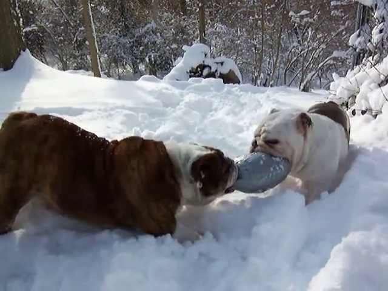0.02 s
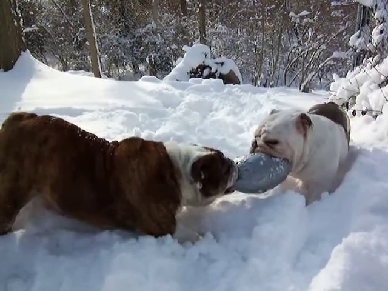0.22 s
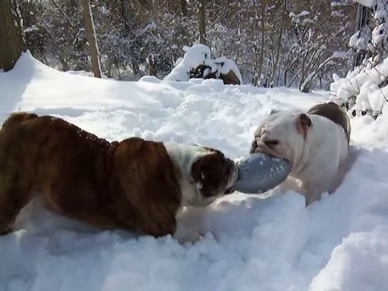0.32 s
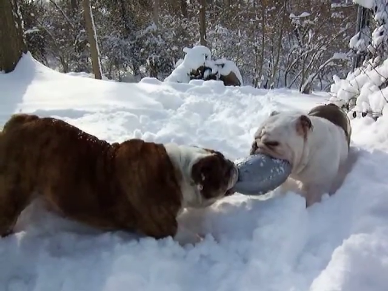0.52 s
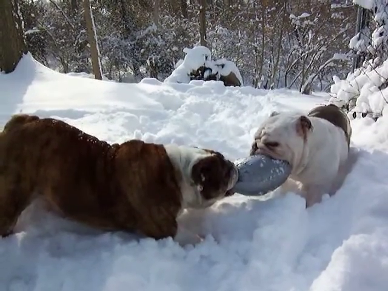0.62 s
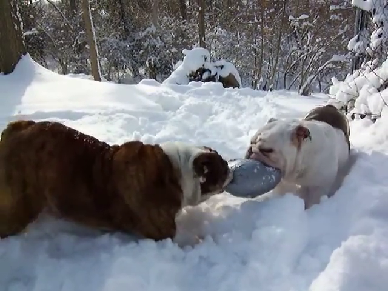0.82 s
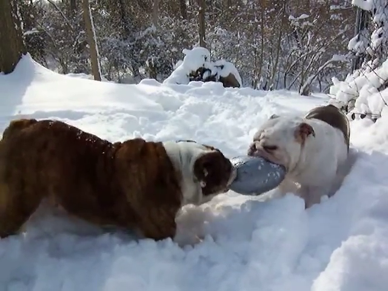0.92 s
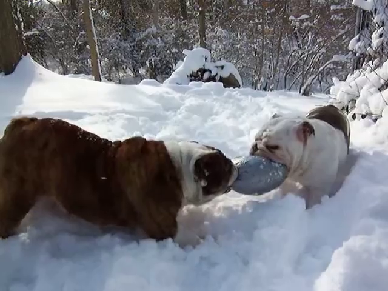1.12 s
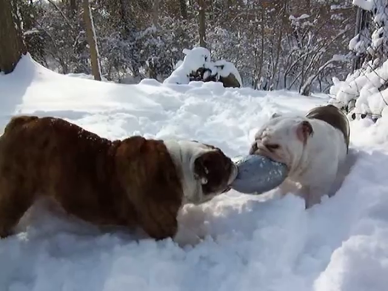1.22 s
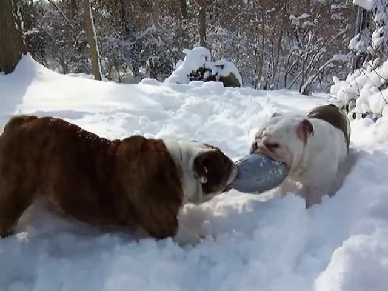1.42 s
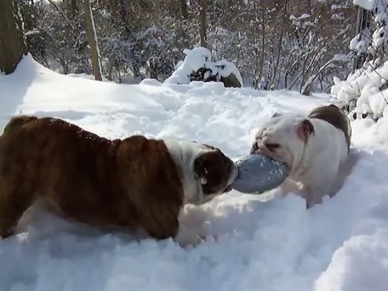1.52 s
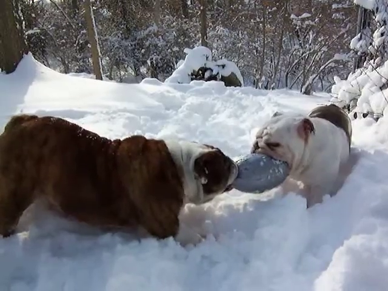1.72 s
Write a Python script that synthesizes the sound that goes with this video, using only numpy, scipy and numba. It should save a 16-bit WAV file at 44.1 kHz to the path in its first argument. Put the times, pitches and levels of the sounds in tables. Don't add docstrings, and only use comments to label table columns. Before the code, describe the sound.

Rough fluttering dog growl breaks into a single sharp bark, followed by a quieter growl.

```python
import sys
import numpy as np
from scipy import signal
from scipy.fft import rfft, irfft
from scipy.io import wavfile
from numba import njit

SR = 44100
rng = np.random.default_rng(int(sys.argv[2]) if len(sys.argv) > 2 else 0)


def wav_record(signal):
    frames = np.transpose(np.atleast_2d(signal))
    bounded = np.clip(frames, -1, 1)
    quanta = np.round(bounded * 32767).astype(np.int16)
    wavfile.write(sys.argv[1], SR, quanta)


def volts(x):
    e = np.asarray(x, float) / 20
    return 10 ** e


N = 79380
TIME_S = np.arange(N) / SR


def rms_one(x):
    return x / np.sqrt(np.mean(x ** 2) + 1e-20)


def in_time(rows):
    s, *columns = np.transpose(rows)
    return [np.interp(TIME_S, s, column) for column in columns]


def impulses(s, heights):
    x = np.zeros(N)
    x[(s * SR).astype(int)] = heights
    return x


@njit
def two_pole(x, a1, a2):
    y = np.zeros(len(x))
    for i in range(2, len(x)):
        y[i] = (1 - a2) / 2 * (x[i] - x[i - 2]) + a1[i] * y[i - 1] - a2 * y[i - 2]
    return y


def resonate(x, hz, width_hz):
    r = np.exp(-np.pi * width_hz / SR)
    a1 = 2 * r * np.cos(2 * np.pi * hz / SR)
    x = x + 1e-18
    if np.ndim(hz):
        return two_pole(x, a1, r * r)
    return signal.lfilter([(1 - r * r) / 2, 0, (r * r - 1) / 2], [1, -a1, r * r], x)


def twice(x, hz, width_hz):
    return resonate(resonate(x, hz, width_hz), hz, width_hz)


def tract(x, table, scale=1, unsteady=False):
    def waver():
        if not unsteady:
            return 0
        return np.interp(np.arange(N), np.linspace(0, N, 60), rng.standard_normal(60))

    total = 0
    for k, (hz, width_hz, db) in enumerate(table):
        gain = volts(db + 1.0 * waver())
        centre_hz = hz * (scale + 0.029 * waver())
        total = total + (-1) ** k * gain * twice(x, centre_hz, width_hz)
    return rms_one(total)


def bumps(s, db, length, leak=0):
    d = (TIME_S - np.array(s)[:, None]) / np.array(length)[:, None]
    skew = np.where(d < -.15, 1.47 * (d + 0.15), 0.75 * (d + 0.056))
    swell = np.exp(-4 * skew ** 2)
    skirt = np.exp(-.6 * d ** 2)
    return volts(np.array(db)) @ (swell + leak * skirt) / (1 + leak)


def folds(rate_hz, jitter, spread_db, breath, puff_s):
    draws = np.clip(rng.standard_normal((700, 2)), -1.6, 1.6)
    periods = np.clip(1 + jitter * draws[:, 0], .4, 2)
    cycles = np.interp(np.cumsum(periods), np.cumsum(rate_hz) / SR, np.arange(N))
    pulses = np.zeros(N)
    pulses[cycles.astype(int)] = -volts(spread_db * draws[:, 1])
    pulses[-1] = 0
    puff = signal.lfilter([1], [1, -np.exp(-1 / (puff_s * SR))], abs(pulses)) * rng.standard_normal(N)
    softened = signal.lfilter([1], [1, -.7], pulses)
    return pulses, rms_one(softened) + breath * rms_one(puff)


def growl(flaps, hiss_lag_s, chest, throat, nose, mouth, chest_hz, chest_width_hz, leak,
          jitter, spread_db, breath, chest_gate, hiss_db):
    s, throat_db, nose_db, length = np.transpose(flaps)
    chest_db, rate_hz = in_time(chest)
    pulses, source = folds(rate_hz, jitter, spread_db, breath, 0.015)

    rumble = twice(rms_one(pulses) + 2.3 * rng.standard_normal(N), chest_hz, chest_width_hz)
    rumble = in_time(chest_gate)[0] * volts(chest_db) * rms_one(rumble)

    hiss = tract(.5 * source + rng.standard_normal(N), nose)
    hiss = hiss * bumps(s + hiss_lag_s, nose_db, length, 1.3 * leak) * volts(hiss_db)

    sag = np.interp(TIME_S, np.ravel(s[:, None] + [-.016, .016]), np.tile([1, -1], len(s)))
    scale = 1 + 0.22 * (in_time(mouth)[0] - .5) + .075 * sag
    voice = tract(source, throat, scale, unsteady=True)
    return bumps(s, throat_db, length, leak) * voice + rumble + hiss


def outdoors():
    # time in seconds, wind level in dB.
    gusts = [(0.0, -27.5), (0.034, -58), (0.1, -42), (0.832, -42.5), (0.902, -55.5), (1.132, -58),
             (1.162, -49), (1.378, -52), (1.408, -56), (1.638, -50), (1.678, -59), (1.8, -43)]
    # frequency in Hz, level in dB.
    air = [(59, -32), (200, -5.5), (817, -16), (2640, -21), (2950, -29.5), (3120, -27.5), (7060, -25),
           (8500, -37), (11000, -64.5), (18700, -120)]
    band = signal.butter(3, [30, 90], "band", fs=SR, output="sos")
    wind = signal.sosfilt(band, rng.standard_normal(N + SR))[SR:]
    air_hz, air_db = np.transpose(air)
    hz = np.fft.rfftfreq(N, 1 / SR) + 1
    shape = volts(np.interp(np.log(hz), np.log(air_hz), air_db)) * (hz > 200)
    still = irfft(rfft(rng.standard_normal(N)) * shape, N)
    return volts(in_time(gusts)[0]) * rms_one(wind) + volts(-64.5) * rms_one(still)


def ticks():
    # time in seconds, level in dB.
    clicks = [(.238, -25), (.252, -26), (.365, -24), (.373, -25), (.53, -24), (1.136, -42), (1.349, -44),
              (1.48, -39), (1.612, -46), (1.588, -48), (1.738, -48), (1.746, -46)]
    s, db = np.transpose(clicks)
    return resonate(impulses(s, -4 * volts(db)), 880, 1720)


def tugging_bodies():
    # time in seconds, level in dB.
    thumps = [(1.167, -43), (1.227, -44), (1.34, -39.5), (1.526, -50), (1.625, -55)]
    # time in seconds, level in dB.
    heaves = [(1.421, -42.5), (1.524, -52), (1.589, -49.5), (1.689, -51.5)]
    s, db = np.transpose(thumps)
    low = twice(impulses(s - .006, 400 * volts(db)), 88, 90)
    s, db = np.transpose(heaves)
    return low + twice(impulses(s - .012, -900 * volts(db)), 36.6, 40)


def snorts():
    # time in seconds, level in dB, length in seconds.
    breaths = [(.0, -47.5, 0.023), (0.037, -51.5, 0.043), (1.163, -60.5, 0.019), (1.72, -66, 0.026),
               (1.765, -62.5, 0.043), (1.544, -55.5, 0.041), (1.558, -52.5, 0.0055), (1.573, -54.5, 0.017),
               (1.593, -56, 0.014)]
    # centre in Hz, width in Hz, level in dB.
    nostrils = [(570, 260, 4.5), (1050, 1200, -3.5), (2440, 520, 1.5), (3720, 1170, 1.5),
                (5070, 1180, -8.5), (6610, 1500, 0), (8000, 1400, -27)]
    return bumps(*np.transpose(breaths)) * tract(rng.standard_normal(N), nostrils)


def ball_squeaks():
    # time in seconds, level in dB, length in seconds.
    rubs = [(.118, -45, 0.015), (0.255, -37, 0.011), (0.291, -39, 0.0064), (0.433, -41, 0.013),
            (0.564, -40, 0.025), (0.742, -39.5, 0.02), (1.057, -51.5, 0.046)]
    return rms_one(twice(rng.standard_normal(N), 1892, 470)) * bumps(*np.transpose(rubs))


def far_dog():
    # time in seconds, throat level in dB, nostril hiss in dB, length in seconds.
    flaps = [(.968, -39.5, -52.5, 0.049), (1.01, -47, -57.5, 0.021), (1.058, -47, -58.5, 0.038),
             (1.097, -48, -61, 0.021), (1.145, -44.5, -54, 0.026), (1.188, -48.5, -60.5, 0.03),
             (1.228, -55.5, -57.5, 0.023), (1.274, -48.5, -62, 0.05), (1.312, -56.5, -57, 0.018),
             (1.357, -48, -59, 0.027), (1.402, -51.5, -58, 0.026), (1.444, -51, -54, 0.011),
             (1.484, -52.5, -57, 0.022)]
    # time in seconds, delay of hiss behind voice in seconds.
    hiss_lag = [(1.0, 0.0041), (1.36, 0.011), (1.42, 0.013), (1.5, 0.026)]
    # time in seconds, level in dB, pulse rate in Hz.
    chest = [(0.95, -48.5, 175.0), (1.214, -53, 175.0), (1.374, -52.5, 175.0), (1.506, -49.5, 175.0),
             (1.544, -70, 175.0), (1.56, -70, 175.0)]
    # centre in Hz, width in Hz, level in dB.
    throat = [(542, 150, 5), (923, 203, 1), (1460, 490, -14), (1990, 290, -10), (3610, 480, -9.5)]
    # centre in Hz, width in Hz, level in dB.
    nose = [(2170, 740, -3.5), (3670, 1100, -3.5), (5000, 530, -10.5), (6440, 1600, -6.5)]
    # time in seconds, mouth opening from 0 to 1.
    mouth = [(1.0, 1), (1.05, 0.76), (1.109, 0.076), (1.15, 0.81), (1.21, 0.15), (1.3, 0.53), (1.502, 0.44)]
    lag_s = np.interp(np.array(flaps)[:, 0], *np.transpose(hiss_lag))
    return growl(flaps, lag_s, chest, throat, nose, mouth, chest_hz=157.3, chest_width_hz=73, leak=.25,
                 jitter=.14, spread_db=2, breath=.9,
                 chest_gate=[(.88, 0), (.93, 1), (1.5, 1), (1.53, 0)], hiss_db=-1.0)


def teeth_whistle():
    # time in seconds, level in dB, length in seconds.
    bursts = [(0.067, -50.5, 0.02), (0.112, -47.5, 0.024), (0.16, -40.5, 0.018), (0.208, -43.5, 0.017),
              (0.253, -48.5, 0.039), (0.297, -42.5, .03), (0.342, -45, 0.011), (.37, -45, 0.021),
              (.392, -51, 0.029), (0.431, -36.5, 0.011), (0.461, -45, .018), (0.481, -44, 0.007),
              (0.524, -45.5, 0.024), (0.568, -43.5, 0.027), (0.608, -41, .025), (0.664, -55.5, 0.044),
              (0.692, -42.5, .035), (0.746, -46, 0.036), (0.783, -41.5, 0.023), (1.159, -55.5, 0.013),
              (1.716, -62.5, 0.03), (1.762, -60.5, 0.044), (1.792, -66, 0.018)]
    breath = folds(np.full(N, 130.), .3, 3, 9, .006)[1]
    return rms_one(twice(breath, 5200, 650)) * bumps(*np.transpose(bursts), .08)


def fold_snaps():
    # time in seconds, level in dB.
    closings = [(0.0727, -21.5), (0.114, -30), (0.1409, -21), (0.2109, -21), (0.2515, -16), (.2604, -32),
                (0.3005, -19.5), (0.365, -21), (0.371, -18), (.388, -29), (0.4081, -22), (0.5249, -24),
                (0.5552, -27), (0.577, -16), (0.6496, -34.5), (0.6579, -23.5), (0.7042, -27), (0.738, -25),
                (0.7765, -25), (1.4165, -36), (1.4913, -39), (1.7462, -39), (1.7752, -42), (1.7921, -46)]
    s, db = np.transpose(closings)
    snaps = impulses(s - .0009, -volts(db + 41.5))
    soft = signal.sosfilt(signal.butter(2, 600, fs=SR, output="sos"), snaps)
    return resonate(soft, 115, 33)


def near_dog():
    # time in seconds, throat level in dB, nostril hiss in dB, length in seconds.
    flaps = [(.02, -41, -57, 0.068), (.073, -36.5, -46, 0.011), (.115, -39.5, -43, 0.044),
             (.166, -43, -47, 0.023), (.204, -40, -48.5, 0.045), (.247, -42.5, -46, 0.034),
             (.294, -32.5, -43, 0.029), (.339, -37, -40.5, 0.016), (.37, -29.5, -47.5, 0.0075),
             (.395, -36, -45.5, 0.023), (.432, -39, -45.5, 0.034), (.478, -36, -41.5, 0.041),
             (.527, -32, -50.5, 0.012), (.563, -35, -42, 0.041), (.609, -34.5, -50, 0.02),
             (.655, -33.5, -44, 0.023), (.695, -28.5, -38.5, 0.034), (.745, -30, -42, 0.013),
             (.78, -26, -39, 0.03), (1.72, -56.5, -62, 0.012), (1.762, -56, -73.5, 0.029),
             (1.795, -61, -54.5, 0.0212)]
    # time in seconds, level in dB, pulse rate in Hz.
    chest = [(0.0, -36, 120.3), (0.202, -35.5, 125.2), (0.4, -35, 124.3), (0.58, -34, 120.6),
             (0.615, -37, 120.1), (0.649, -30.5, 119.2), (0.752, -43, 119.5), (0.806, -23, 122.8),
             (0.866, -43.5, 111.3), (0.9, -46, 116.7)]
    # centre in Hz, width in Hz, level in dB.
    throat = [(271, 72, -9), (424, 275, -5), (576, 237, 2), (917, 372, 2), (1935, 235, -4.5),
              (2426, 370, -7.5), (3930, 390, -19)]
    # centre in Hz, width in Hz, level in dB.
    nose = [(3704, 890, 0), (5020, 370, -5), (6300, 3400, -6), (8650, 620, -12)]
    # time in seconds, mouth opening from 0 to 1.
    mouth = [(0.0, 0.23), (.4, 0.31), (.65, 0.47), (.8, 0.52)]
    return growl(flaps, 0, chest, throat, nose, mouth, chest_hz=112, chest_width_hz=101, leak=0.46,
                 jitter=.24, spread_db=1.5, breath=2.3,
                 chest_gate=[(.88, 1), (.92, 0), (1.68, 0), (1.74, .2)], hiss_db=-7.5)


def bark():
    # time in seconds, level in dB, fold rate in Hz, mouth resonance in Hz.
    course = [
        (.796, -38, 259, 1590),
        (.802, -28.5, 258, 1650),
        (.811, -18.5, 257.3, 1746),
        (.818, -15, 261.5, 1720),
        (.865, -19, 276.7, 1966),
        (.9, -20, 288.4, 2022),
        (.94, -27.5, 291.9, 1944),
        (.955, -33.5, 201.7, 2080),
        (1.0, -68, 152, 1990),
    ]
    # time in seconds, extra level in dB.
    jolts = [(.8025, 9), (.8145, 6), (.8186, 8), (.8214, 6), (.8318, 9), (.8431, 9), (.8546, 7), (.864, 12),
             (.874, 4), (.8775, 7), (.8855, 4), (.9003, 7), (.9145, 5), (.933, 7)]
    # centre in Hz, width in Hz, level in dB.
    throat = [(218, 52, -12.5), (432, 330, -8.5), (746, 165, -0.5), (940, 394, -5.5), (1600, 660, -7.5),
              (2585, 77, -15)]
    # centre in Hz, width in Hz, level in dB.
    rasp_bands = [(3545, 780, 7), (4740, 700, -14), (5950, 1100, 12.5), (7900, 4500, -18.5)]

    db, rate_hz, mouth_hz = in_time(course)
    source = folds(rate_hz, .2, 2.5, 1.25, .003)[1]
    s, extra_db = np.transpose(jolts)
    source[(s * SR).astype(int) - 12] -= 16 * volts(extra_db)

    age_s = np.clip(TIME_S - .82, 0, 1)
    air = 0.53 * source + rng.standard_normal(N)
    rasp = tract(air, rasp_bands[:2]) * volts(-15 - 34.5 * age_s)
    rasp += tract(air, rasp_bands[2:]) * volts(-18 - 93.5 * age_s)

    voice = twice(source, mouth_hz, 650)
    for k, (hz, width_hz, level_db) in enumerate(throat):
        thinning_db = 52 * age_s * (hz < 900)
        voice = voice + (-1) ** k * volts(level_db - thinning_db) * twice(source, hz, width_hz)
    voice = voice / np.std(voice[int(.8 * SR):int(.95 * SR)])
    sounding = abs(TIME_S - .9) < .11
    return volts(db) * sounding * (voice + rasp)


def scene():
    background = outdoors() + ticks() + tugging_bodies() + snorts() + ball_squeaks()
    near = teeth_whistle() + fold_snaps() + near_dog() + bark()
    return (background + far_dog() + near)[None]


def band_limit(x):
    return signal.sosfilt(signal.butter(12, 9050, fs=SR, output="sos"), x)


def record(dry):
    rounded = np.tanh(dry / 1.121) * 1.082
    x = signal.sosfilt(signal.butter(4, 7500, fs=SR, output="sos"), rounded)
    x = signal.sosfilt(signal.cheby2(10, 60, 9800, fs=SR, output="sos"), x)
    return band_limit(x)


dry = scene()
out = record(dry)
wav_record(out)
```